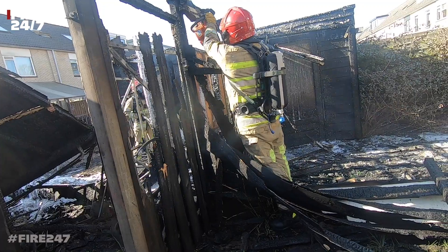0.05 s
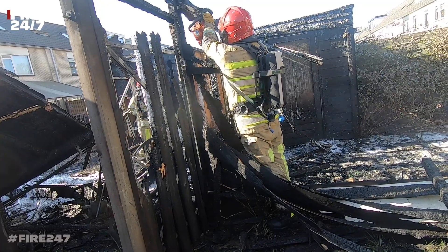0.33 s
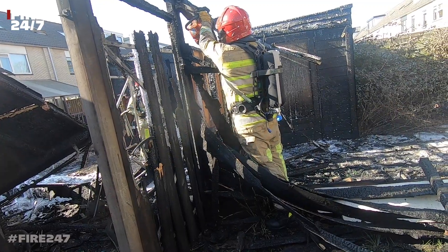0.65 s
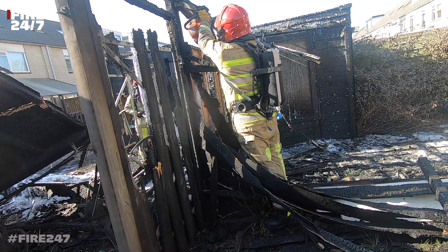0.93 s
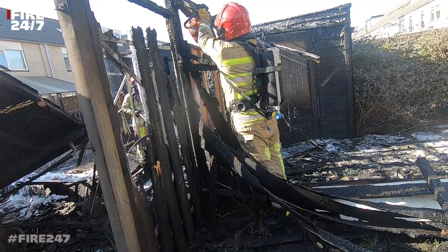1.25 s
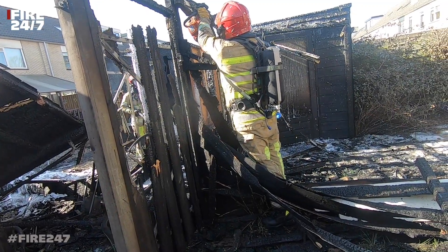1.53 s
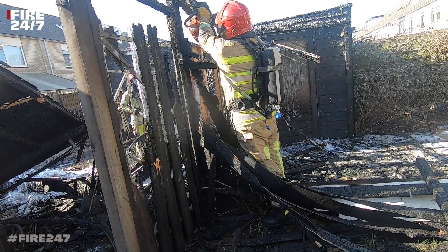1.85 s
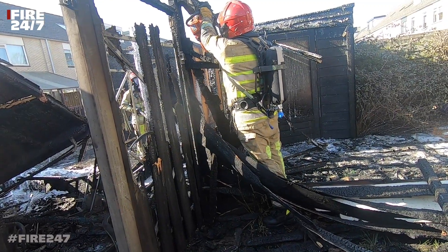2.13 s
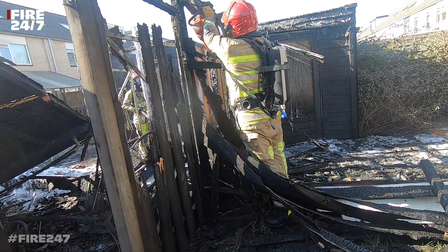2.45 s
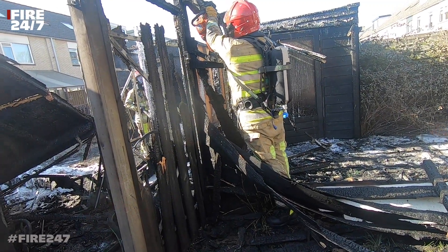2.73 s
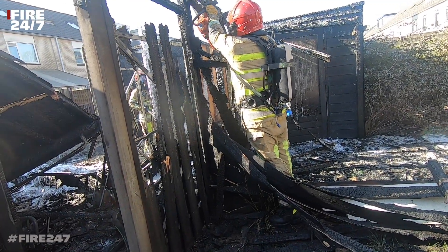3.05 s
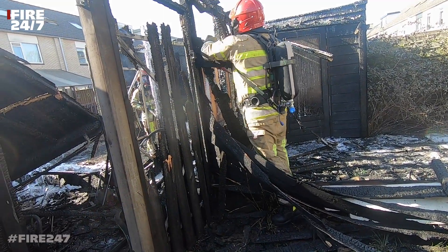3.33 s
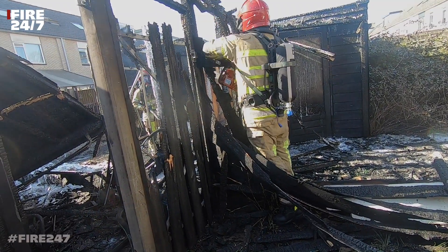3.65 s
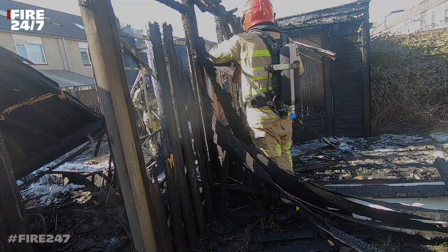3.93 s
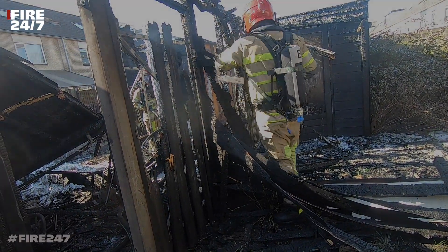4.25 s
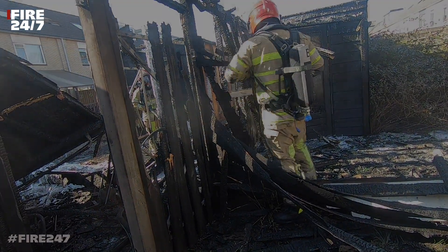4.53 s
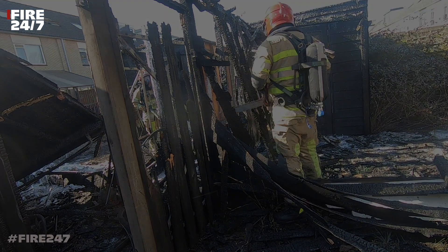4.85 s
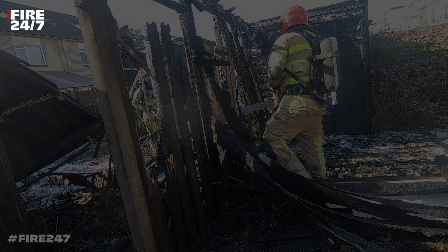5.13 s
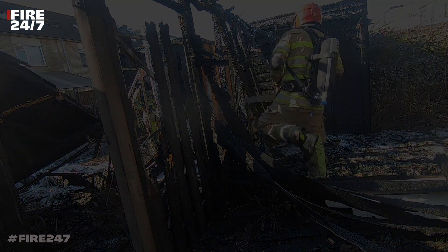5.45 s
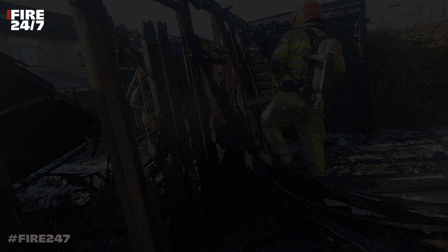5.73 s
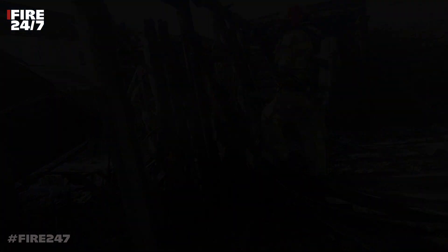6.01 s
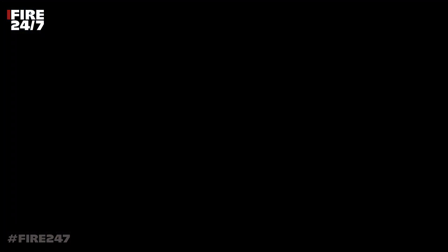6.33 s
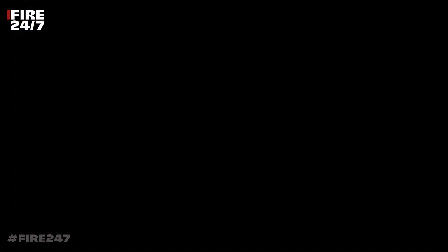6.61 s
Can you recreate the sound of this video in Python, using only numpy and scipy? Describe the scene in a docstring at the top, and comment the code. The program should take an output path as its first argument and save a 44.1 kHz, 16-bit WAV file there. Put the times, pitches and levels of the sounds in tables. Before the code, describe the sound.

A chainsaw cuts through wood at full throttle outdoors, then winds down to a puttering, clinking idle and fades out.

```python
"""Chainsaw in a yard

A two-stroke saw cuts through a charred post, heard on one microphone with a breeze rumbling on it.
Firing pulses ring the muffler, the cutters rasp, and the speed sags each time the chain bites.
The throttle is let go, the engine coasts down to a puttering idle and the slack chain clinks on
its bar. A piece of timber thuds as the scene fades out."""
import sys
import numpy as np
from scipy import signal
from scipy.fft import rfft, irfft
from scipy.io import wavfile
from scipy.ndimage import uniform_filter1d, map_coordinates

SR = 44100
rng = np.random.default_rng(int(sys.argv[2]) if len(sys.argv) > 2 else 0)


def put_to_file(sound):
    """Save the sound as 16-bit audio at rate SR, in the file named by the first command-line argument."""
    columns = np.atleast_2d(sound).T  # one column per channel
    safe = np.clip(columns, -1, 1)
    whole_steps = np.round(safe * 32767)
    wavfile.write(sys.argv[1], SR, whole_steps.astype(np.int16))


N = 298991
TIME = np.arange(N) / SR

# spectrum of chain and casing rattling at idle: f/Hz, level/dB
RATTLE_SPECTRUM = [(820, -32), (1400, -13), (1730, -15), (2500, -0.5), (2740, 0), (3010, 0.5), (3300, -6),
                   (3800, -5), (4370, -13.5), (4840, -10), (5410, -23), (5880, -19.5), (8550, -24),
                   (10200, -58), (13000, -52)]


def from_db(db):
    """Decibels to gain."""
    return 10 ** (np.asarray(db) / 20)


def rms_one(x):
    """Scale to unit power."""
    return x / np.sqrt(np.mean(x ** 2) + 1e-20)


def even(x, size=3500):
    """Take out slow changes of level, keep the single beats."""
    power = uniform_filter1d(uniform_filter1d(x ** 2, size), size)
    return x / np.sqrt(np.abs(power) + 1e-12)


def read_off(rows, at=TIME):
    """A table's other columns, interpolated along its first (time by default)."""
    axis, *columns = np.transpose(sorted(rows))
    return np.array([np.interp(at, axis, column) for column in columns])


def noise():
    """White noise."""
    return rng.standard_normal(N)


def drift(rate_hz):
    """Random wander of unit power."""
    knots = rng.standard_normal(8192)
    return rms_one(map_coordinates(knots, [TIME * rate_hz * 2], order=1, mode="wrap"))


def swell(centre_s, half_length_s):
    """A bell-shaped rise and fall of height 1."""
    return np.exp(-((TIME - centre_s) / half_length_s) ** 2)


def bursts(events, t60):
    """Envelope of blows that start at once and die away."""
    return sum(from_db(db - 60 * np.maximum(TIME - s, 0) / t60) * (TIME >= s) for s, db in events)


def colour(x, spectrum, size=8192):
    """Minimum-phase filter of unit power gain: the spectrum's levels set only its shape."""
    hz, db = np.transpose(spectrum)
    grid = np.maximum(np.fft.rfftfreq(size, 1 / SR), 1)
    gain = from_db(np.interp(np.log(grid), np.log(hz), db))
    cepstrum = irfft(np.log(gain))
    cepstrum[1:size // 2] *= 2
    cepstrum[size // 2 + 1:] = 0
    response = irfft(np.exp(rfft(cepstrum)))
    return signal.fftconvolve(x, response / np.linalg.norm(response))[:N]


def blend(throttle, idling, flat_out, coasting, idle):
    """Cross over between the saw's three ways of running, at even power."""
    off_throttle = (1 - idling) * even(coasting) + idling * even(idle)
    return even(throttle * even(flat_out) + (1 - throttle) * off_throttle)


def yard(x, wet_db, t60):
    """Fences and sheds scatter a short tail that reaches the microphone 6 ms after the direct sound."""
    t = TIME[:SR // 2]
    tail = rng.standard_normal(len(t)) * from_db(-60 * t / t60) * (t > .006)
    return x + from_db(wet_db) * signal.fftconvolve(x, tail / np.linalg.norm(tail))[:N]


def breeze():
    """Air buffets the microphone: a lumpy low rumble that rises in gusts."""
    # gusts: t/s, half length/s, peak level/dB
    gusts = [(0.174, 0.14, -25), (.62, .05, -26.5), (.85, .05, -22.5), (2.19, .04, -29),
             (3.27, 0.054, -28.5), (3.885, .03, -24), (4.106, 0.036, -24.5), (4.23, 0.053, -23),
             (5.03, 0.63, -27.5)]
    # spectrum of the buffeting: f/Hz, level/dB
    rumble = [(8, -33.5), (22, -10.5), (45, 0.5), (80, -2.5), (120, -6), (200, -10.5), (400, -25.5),
              (1500, -71.5)]
    strength = from_db(-36 + 2.5 * drift(4))
    for s, half_length, db in gusts:
        strength = np.hypot(strength, from_db(db) * swell(s, half_length))
    return strength * even(colour(noise(), rumble))


def timber():
    """A piece of timber lands in the yard with a dull, crumbling double knock."""
    # landing and bounce: t/s, level/dB
    thuds = [(5.295, -15), (5.309, -17.5)]
    # spectrum of the wood: f/Hz, level/dB
    wood = [(60, -18), (150, -1), (240, 4), (330, 3.5), (450, -23), (700, -5), (1200, -21.5), (1800, -33),
            (5000, -59)]
    return colour(noise() * bursts(thuds, t60=0.071), wood)


def clinks(ring_db=-12.5, click_db=-14):
    """Slack links land one after another and set the guide bar ringing."""
    # chain slapping the bar: t/s, relative level/dB
    landings = [(4.3405, -21.5), (4.5345, -24), (4.621, -17.5), (4.723, -18), (4.872, -20.5),
                (4.9547, -16.5), (5.0402, -20.5), (5.097, -21), (5.2316, -22.5), (5.3767, -22.5),
                (5.4653, -25), (5.5257, -22.5), (5.5892, -20.5), (5.69, -23), (5.7768, -23), (5.8938, -17),
                (5.9876, -20), (6.0643, -17.5)]
    # modes of the bar: f/Hz, relative level/dB, t60/s
    bar_modes = [(2680, -49, 0.12), (2797, -3.5, .11), (3060, 0, 0.13), (3020, -12, 0.037),
                 (3300, -25, 0.073), (3780, -10.5, 0.05), (3760, -13, 0.058), (4470, -17, 0.022),
                 (4990, -19, 0.027), (7440, -15, 0.017)]
    slaps = noise() * uniform_filter1d(bursts(landings, t60=.055), size=200, origin=99)
    ring = 0
    for hz, db, t60 in bar_modes:
        r, w = from_db(-60 / (t60 * SR)), 2 * np.pi * hz / SR
        gain = from_db(db) * np.sin(w) * np.sqrt(1 - r * r)
        ring += signal.lfilter([gain], [1, -2 * r * np.cos(w), r * r], slaps + 1e-18)
    return from_db(ring_db) * ring + from_db(click_db) * colour(slaps, RATTLE_SPECTRUM)


def cut_rings(pulling, width_hz=29):
    """The cutters keep a few narrow resonances ringing as long as they bite."""
    # resonances of the saw pressed into the cut: f/Hz, level/dB
    resonances = [(2169, -46), (2832, -47), (3182, -50), (5044, -63), (5771, -63)]
    r = np.exp(-np.pi * width_hz / SR)
    rings = 0
    for hz, db in resonances:
        ring = signal.lfilter([1, 0, -1], [1, -2 * r * np.cos(2 * np.pi * hz / SR), r * r], noise())
        rings += from_db(db) * rms_one(ring)
    return pulling * rings


def firings(turns, lope, idling):
    """One pulse a crank turn, its strength swayed by the lope and scattered at random."""
    strength = (1 + .2 * lope + 0.11 * noise()) * from_db(-0.1 * idling * noise())
    return strength * np.diff(np.floor(turns), prepend=0)


def puffs(pulses, decay_s, rise_s=0.00062):
    """Noise that swells and dies after every pulse, at even power."""
    poles = np.exp(-1 / (np.array([decay_s, rise_s]) * SR))
    return even(noise() * signal.lfilter([1], np.poly(poles), pulses + 1e-18))


def sprocket_whine(turns):
    """Links mesh with the sprocket; each order wavers, and swells as it crosses a cover resonance."""
    # meshing tones: multiple of crank speed, relative level/dB
    orders = [(10, -12), (10.72, -20), (13, -19), (14, -15), (14.28, -13), (16, -11), (17, -24.5),
              (18, -15), (21, -18.5), (28, -22)]
    # resonances of the sprocket cover: f/Hz, level/dB
    cover = [(700, -32), (1050, 7), (1250, 2.5), (1480, -17), (1680, -2.5), (1900, -7), (2100, -4),
             (2320, 3.5), (2600, -8.5), (3200, -2), (4500, -13.5), (8000, -35.5)]
    mesh = 0
    for order, db in orders:
        tone = np.sin(2 * np.pi * order * turns + 1.3 * drift(25))
        mesh += from_db(db) * tone * (1 + .5 * drift(12))
    return rms_one(colour(mesh, cover))


def chain(turns, pulses, throttle, idling):
    """Cutters tear the wood in uneven bites; running free, links and casing tick with each turn."""
    # spectrum of the chain in the wood: f/Hz, level/dB
    cut_spectrum = [(820, -11.5), (1400, -12), (1500, -19), (1690, -6.5), (2030, -1.5), (2220, -2),
                    (3190, -2.5), (4540, -16.5), (4970, -11.5), (6260, -20.5), (8470, -20.5), (9460, -23.5),
                    (10400, -47), (13000, -45), (15500, -88.5)]
    # spectrum of the chain running free: f/Hz, level/dB
    free_spectrum = [(820, -39.5), (1400, -14), (1970, -11), (2360, -3.5), (2610, -6), (3640, -7.5),
                     (4730, -23), (5390, -22), (5900, -16.5), (6520, -24), (7430, -20.5), (9360, -31),
                     (10300, -41), (12800, -36.5), (15500, -71.5)]
    ticks = puffs(pulses, decay_s=.014)
    bites = noise() * from_db(2.0 * drift(35) + 1.7 * drift(350))
    cut = colour(rms_one(bites) + .5 * ticks + 0.24 * even(pulses), cut_spectrum)
    links = even(noise() * from_db(0.77 * drift(60)) + 0.38 * ticks)
    free = colour(links + .7 * even(yard(pulses, wet_db=0, t60=.15)), free_spectrum)
    casing = puffs(pulses, decay_s=.009, rise_s=.0016) * from_db(1.5 * drift(25))
    idle = colour(yard(casing, wet_db=-3, t60=.25), RATTLE_SPECTRUM)
    whine = from_db(-3.5 - 4.4 * throttle) * sprocket_whine(turns)   # the wood damps the cutting chain
    return even(blend(throttle, idling, cut, free, idle) + (1 - idling) * whine)


def exhaust(turns, lope_cycles, lope_depth, pulses, throttle, idling, pulling, boom_db, bark_db):
    """Pulses and gas puffs ring the muffler: a deep tonal boom, a bark that frays as the engine slows."""
    # low muffler resonances, at speed and at idle: f/Hz, level/dB
    low_running = [(100, -50), (170, -24.5), (215, -1.5), (250, -1.5), (287, 6.5), (330, -5.5), (375, -3),
                   (420, -26), (600, -67.5)]
    low_idle = [(100, -8.5), (150, -16.5), (205, -16), (240, -1), (265, 3.5), (300, 2), (340, -0.5),
                (390, -13), (440, -20.5), (650, -67)]
    # high muffler resonances, throttle open, shut and at idle: f/Hz, level/dB
    high_open = [(300, -35.5), (410, 6.5), (470, 6), (550, -4), (610, -0.5), (665, 6.5), (770, 2.5),
                 (830, -5.5), (980, -15), (1200, -37), (1500, -44.5), (2500, -68.5)]
    high_shut = [(250, -42.5), (410, -10), (500, 3), (590, 0.5), (680, 4), (780, -5.5), (880, -5),
                 (1050, -6), (1270, -14.5), (1550, -27.5), (2500, -54)]
    high_idle = [(250, -32.5), (410, -7), (500, -6), (590, -3), (680, -1), (780, -6.5), (880, -9),
                 (1050, -15), (1250, -19.5), (1550, -34.5), (2500, -62.5)]
    # spectrum of the post shaken by the cutters: f/Hz, level/dB
    post = [(300, -25), (450, -7.5), (570, 2), (720, -1.5), (850, -5), (970, -3.5), (1150, -10),
            (1400, -19), (2200, -60.5)]
    # hum at the firing rate while the engine pulls: t/s, level/dB
    hum_levels = [(0.0, -18.5), (0.07, -29.5), (0.85, -28.5), (1.11, -31), (1.25, -21.5), (1.45, -27),
                  (2.09, -19.5), (2.22, -29), (2.51, -22.5), (3.33, -20.5)]

    beats = even(pulses)
    gas = puffs(pulses, decay_s=0.0067)
    putter = yard(puffs(pulses, decay_s=.0045, rise_s=.0018), wet_db=-5, t60=.2)   # soft puffs at idle

    # the lope leaves a rough tone just under the second order, beating with it
    undertone = np.cos(2 * np.pi * (2 * turns - lope_cycles) + 0.21 * drift(21)) * (1 + 0.38 * drift(30))
    open_boom = even(colour(beats + 0.35 * gas, low_running)) + from_db(5) * lope_depth * undertone
    shut_boom = colour(yard(beats + (.2 + .7 * idling) * gas, wet_db=-8, t60=.2), low_running)
    idle_boom = colour(putter + yard(beats, wet_db=-3, t60=.2), low_idle)
    boom = even(blend(throttle, idling, open_boom, shut_boom, idle_boom), size=1800)

    growl = colour(noise() + 1.13 * gas, post)
    open_bark = even(colour(beats + .12 * gas, high_open)) + from_db(-14) * growl
    shut_bark = colour(yard(beats + (.28 + 2.2 * idling) * gas, wet_db=-6, t60=.2), high_shut)
    idle_bark = colour(putter + .3 * beats, high_idle)
    bark = blend(throttle, idling, open_bark, shut_bark, idle_bark)

    hum_db, = read_off(hum_levels)
    hum = np.sqrt(2) * np.cos(2 * np.pi * turns - .8) * (1 + 0.15 * drift(30))
    hum_gain = pulling * from_db(hum_db) + idling * from_db(boom_db - 14)
    return from_db(boom_db) * boom + from_db(bark_db) * bark + hum_gain * hum


def saw_levels(speed, pulling, idling):
    """Levels in dB of boom, bark and chain rasp, which follow the crank speed."""
    # in the cut the boom swells as the engine bogs down: speed/(turns/s), boom/dB, bark/dB, rasp/dB
    in_cut = [(140, -14.5, -16.5, -30.5), (151.9, -14, -18, -28.5), (152.3, -18, -16.5, -28.5),
              (166, -19, -16, -27), (180, -22.5, -16, -31)]
    # off the throttle bark and rasp sink with speed: speed/(turns/s), boom/dB, bark/dB, rasp/dB
    coasting = [(174, -44, -20.5, -26.5), (147, -20, -21.5, -28), (126, -23, -26, -26.5),
                (100, -26, -26.5, -30.5), (85, -23.5, -31.5, -29.5), (64, -21.5, -32.5, -34),
                (53.6, -25.5, -33, -37), (45.7, -32, -33.5, -35.5)]
    levels_db = pulling * read_off(in_cut, speed) + (1 - pulling) * read_off(coasting, speed)
    boom_db, bark_db, rasp_db = levels_db + 2 * swell(3.9, 0.015)   # the engine catches once
    sputter_db = 2.5 * (1 - pulling) * (1 - idling)   # coasting, the exhaust stumbles
    return boom_db + sputter_db * drift(22), bark_db + sputter_db * drift(22), rasp_db - 4.5 * idling


def scene():
    """At the microphone: exhaust and chain driven by one crank, over clinks, timber and breeze."""
    # crank speed sagging at each bite, then coasting: t/s, speed/(turns/s)
    cut_revs = [(0.0, 162.0), (0.02, 154.6), (0.07, 146.7), (0.18, 138.1), (0.36, 152.2), (0.49, 152.5),
                (0.55, 144.7), (0.88, 158.9), (1.02, 145.4), (1.26, 159.0), (1.55, 157.2), (1.62, 153.3),
                (1.85, 159.5), (1.94, 153.6), (2.28, 168.1), (2.34, 163.4), (2.63, 165.4), (2.75, 162.0),
                (2.9, 168.5), (3.1, 149.0), (3.25, 178.2), (3.33, 178.5)]
    coast_revs = [(3.37, 161), (3.848, 91.2), (3.91, 87), (3.952, 91), (4.002, 81.9), (4.282, 62.1),
                  (4.36, 61.3), (4.5, 53.6)]
    # throttle: t/s, opening (0-1)
    trigger = [(0, 0.67), (3.3, 0.71), (3.37, 0.4), (3.8, 0.1), (4.25, 0)]
    release_s, release_takes_s = 3.315, 0.045
    idle_from_s, idle_turns_per_s, idle_reach_turns_per_s = 4.68, 47.5, 20

    speed, = read_off([*cut_revs, *coast_revs, (idle_from_s, idle_turns_per_s)])
    throttle, = read_off(trigger)
    pulling = np.clip(1 - (TIME - release_s) / release_takes_s, 0, 1)
    idling = np.exp(-np.maximum(speed - idle_turns_per_s, 0) / idle_reach_turns_per_s)
    boom_db, bark_db, rasp_db = saw_levels(speed, pulling, idling)
    hunting = .003 * drift(30) + .018 * idling * drift(12)
    turns = np.cumsum(speed * (1 + hunting)) / SR
    # the lighter the load, the faster the engine runs and the more it lopes, over three or four turns
    lope_depth = throttle * np.interp(speed, [145, 164], [.35, 1])
    lope_cycles = np.cumsum(49 + 2.0 * drift(7.3)) / SR
    pulses = firings(turns, lope_depth * np.cos(2 * np.pi * lope_cycles), idling)
    engine = exhaust(turns, lope_cycles, lope_depth, pulses, throttle, idling, pulling, boom_db, bark_db)
    rasp = from_db(rasp_db) * chain(turns, pulses, throttle, idling)
    return (engine + rasp + cut_rings(pulling) + clinks() + timber() + breeze())[None]


def record(dry):
    """The mono track is faded out and its top is cut by a steep low-pass."""
    fade_end_s, fade_takes_s, cutoff_hz = 6.205, 1, 15500
    fade = np.clip((fade_end_s - TIME) / fade_takes_s, 1e-9, 1) ** .92
    low_pass = signal.ellip(14, .1, 90, cutoff_hz, fs=SR, output="sos")
    return signal.sosfilt(low_pass, dry * fade)


dry = scene()
out = record(dry)
put_to_file(out)
```